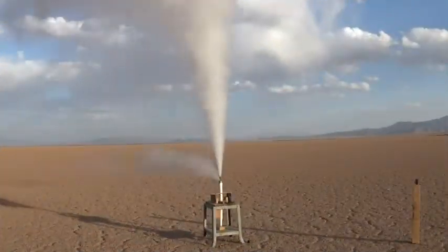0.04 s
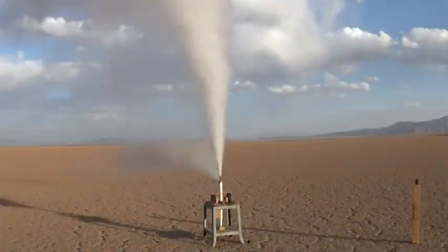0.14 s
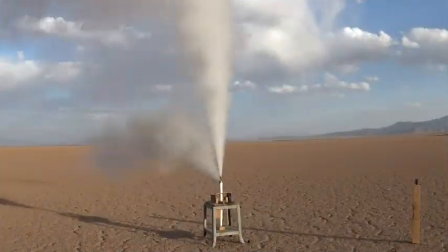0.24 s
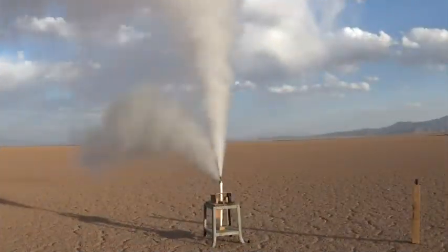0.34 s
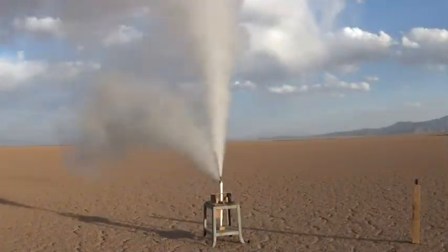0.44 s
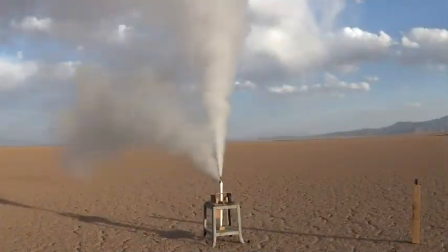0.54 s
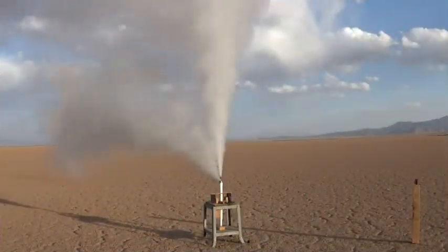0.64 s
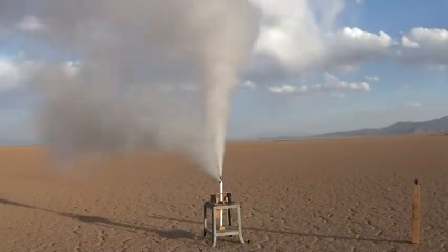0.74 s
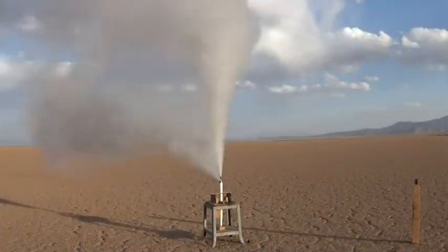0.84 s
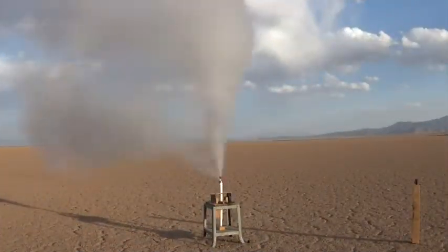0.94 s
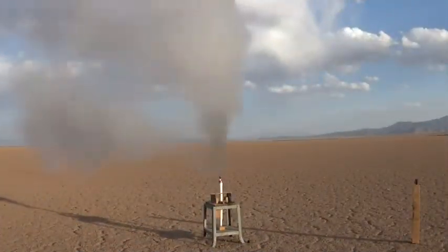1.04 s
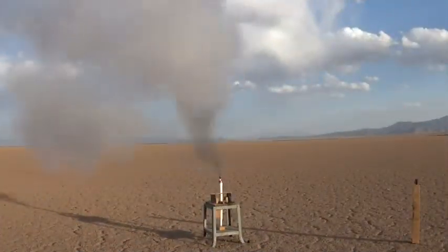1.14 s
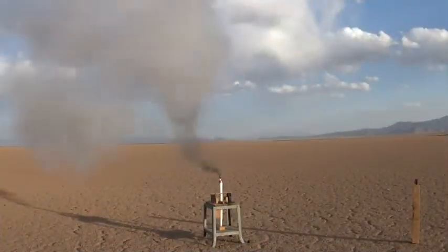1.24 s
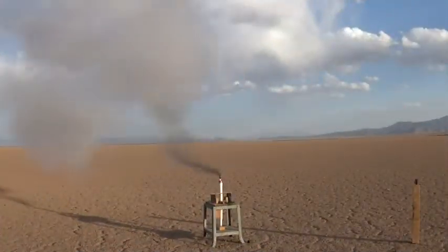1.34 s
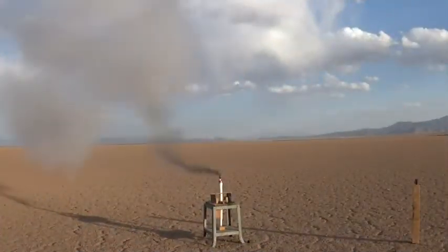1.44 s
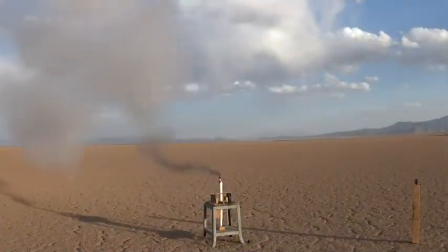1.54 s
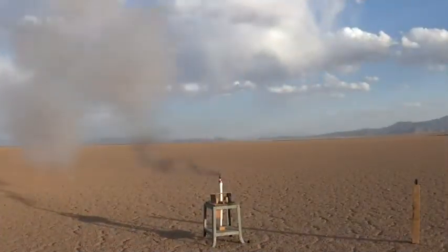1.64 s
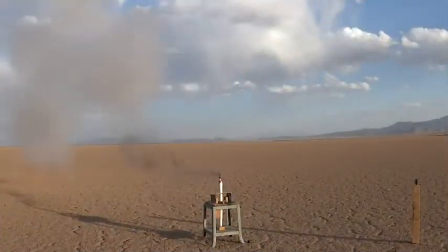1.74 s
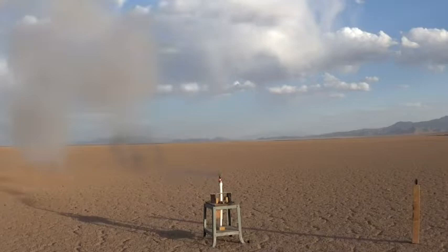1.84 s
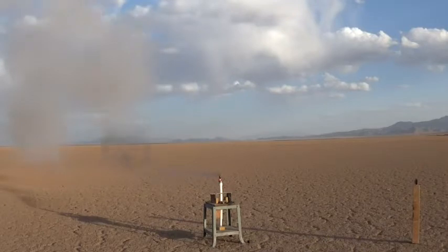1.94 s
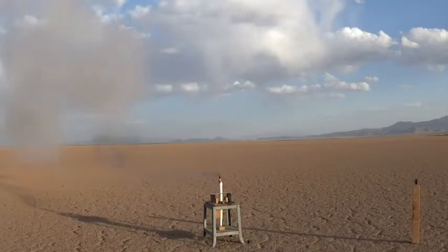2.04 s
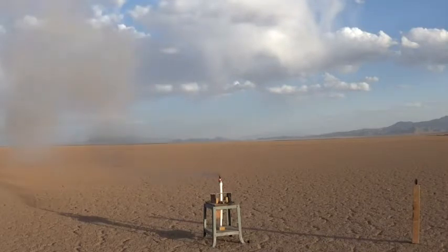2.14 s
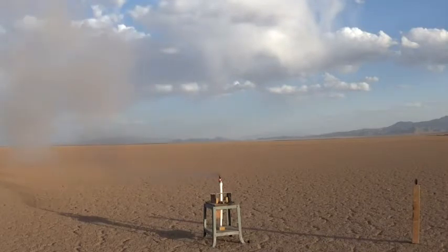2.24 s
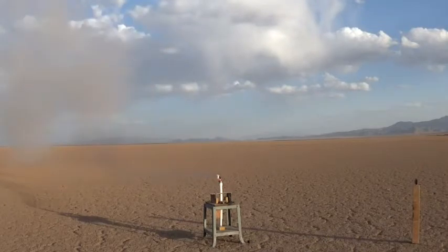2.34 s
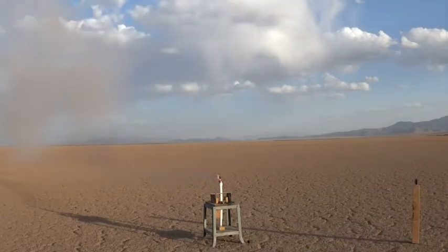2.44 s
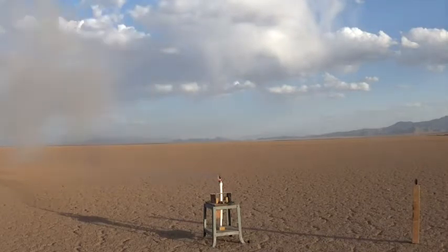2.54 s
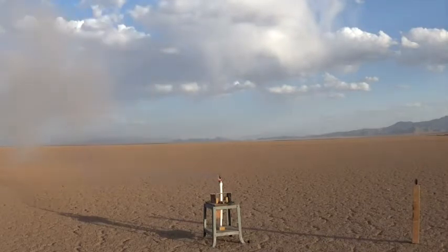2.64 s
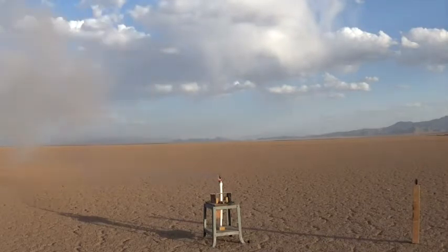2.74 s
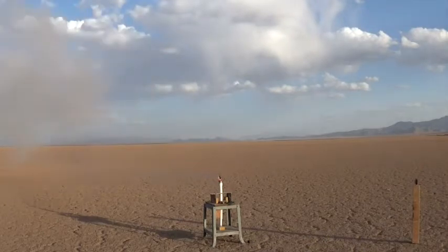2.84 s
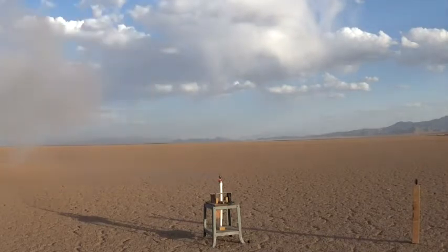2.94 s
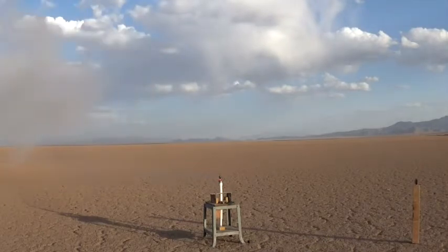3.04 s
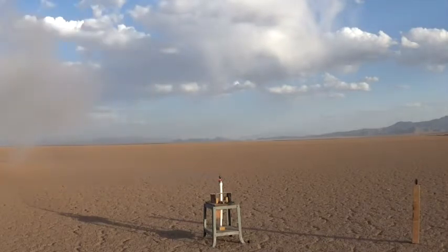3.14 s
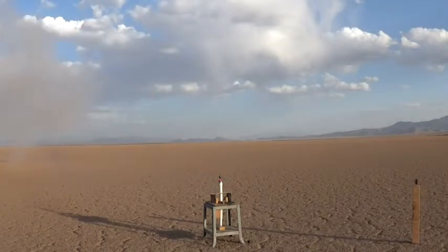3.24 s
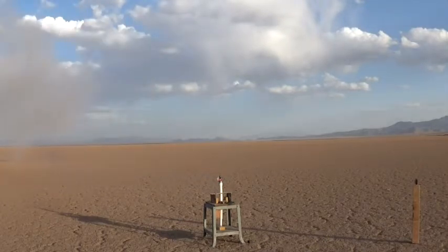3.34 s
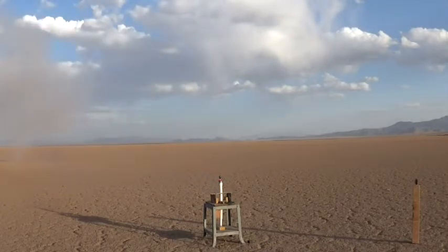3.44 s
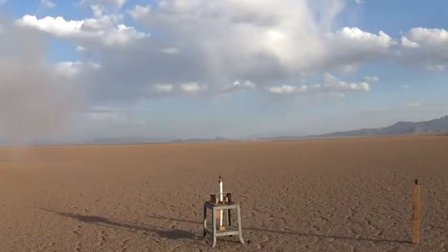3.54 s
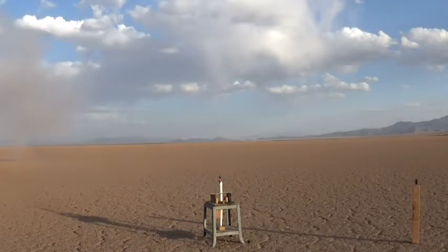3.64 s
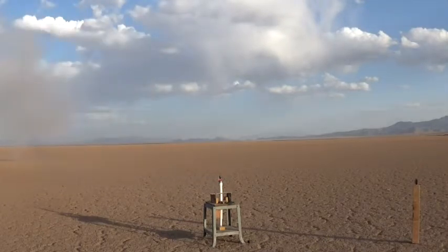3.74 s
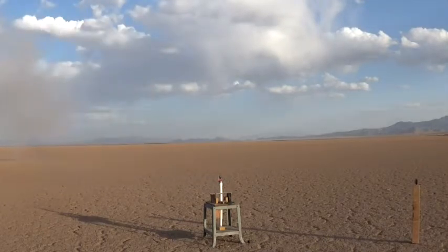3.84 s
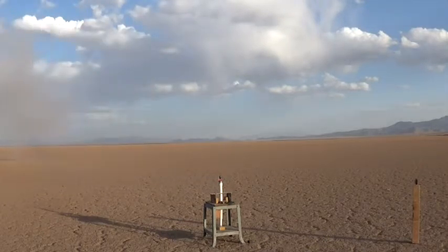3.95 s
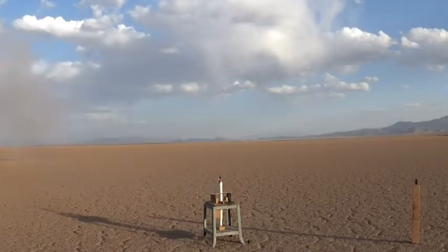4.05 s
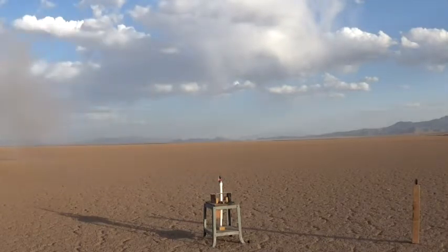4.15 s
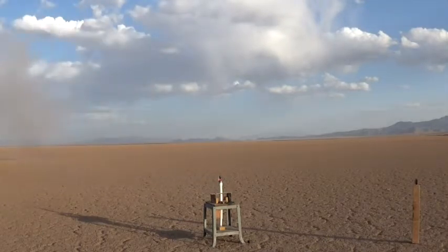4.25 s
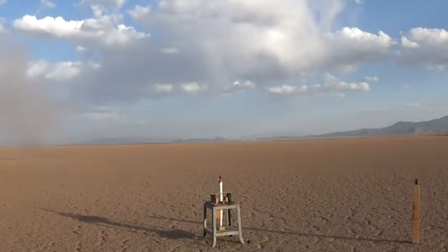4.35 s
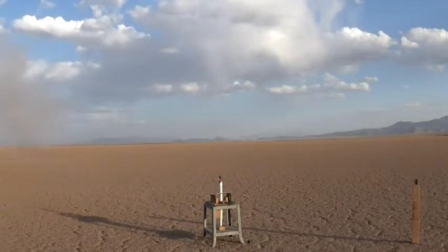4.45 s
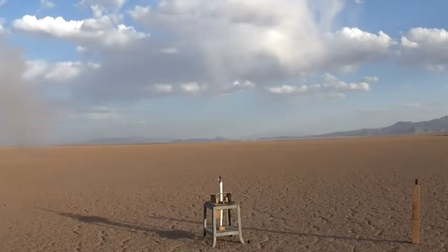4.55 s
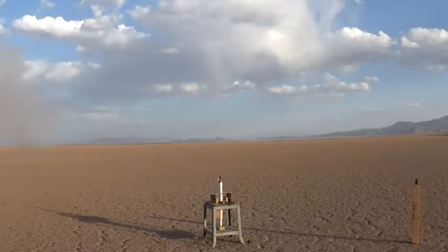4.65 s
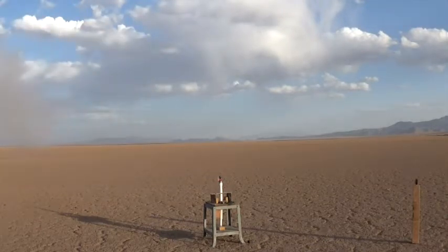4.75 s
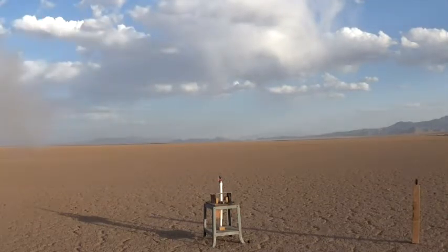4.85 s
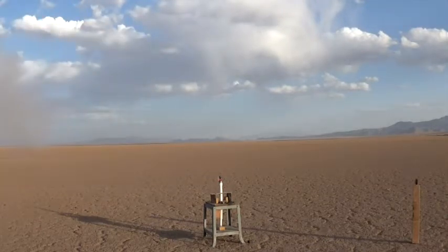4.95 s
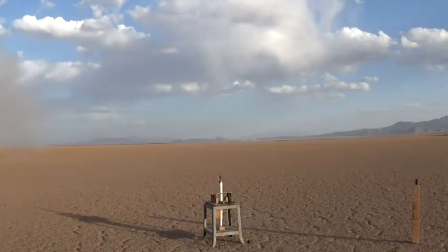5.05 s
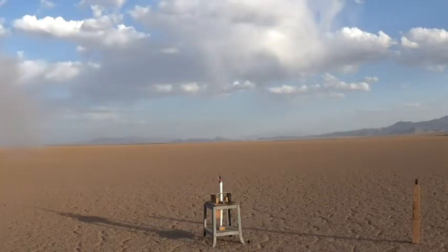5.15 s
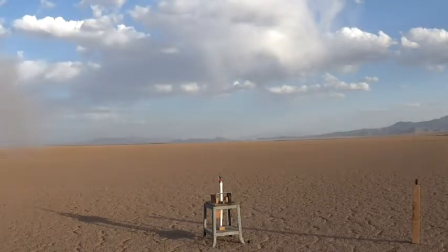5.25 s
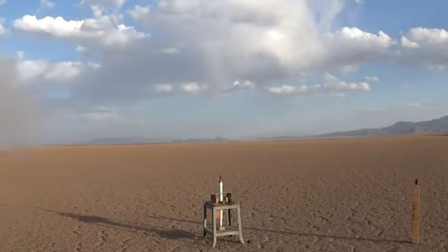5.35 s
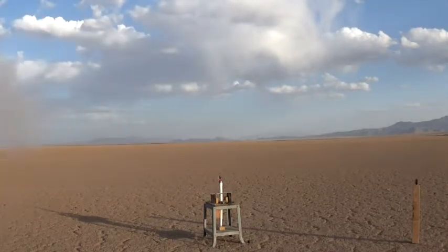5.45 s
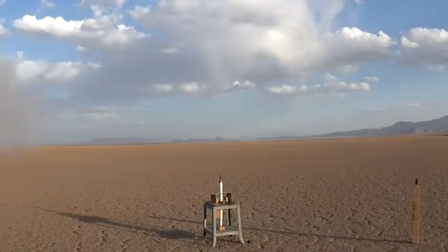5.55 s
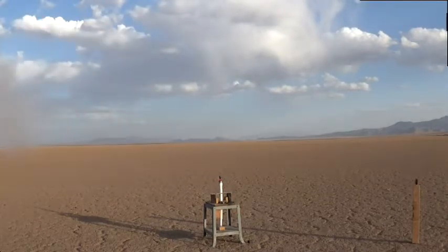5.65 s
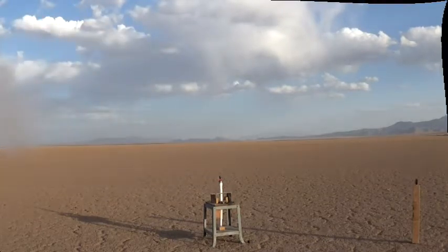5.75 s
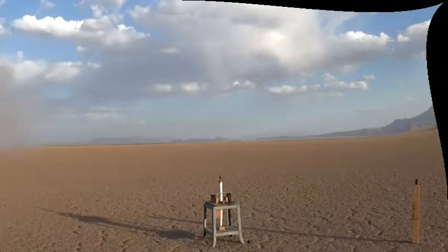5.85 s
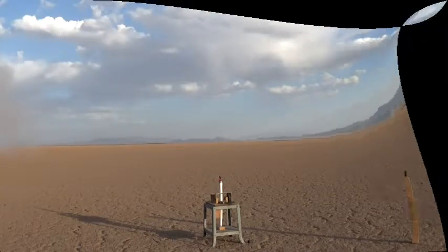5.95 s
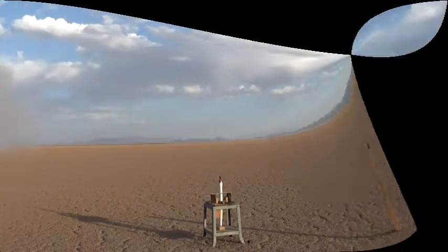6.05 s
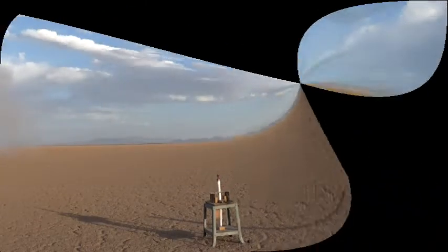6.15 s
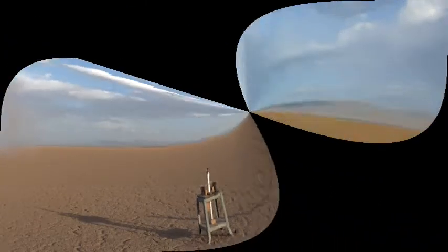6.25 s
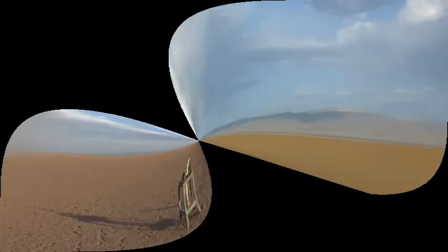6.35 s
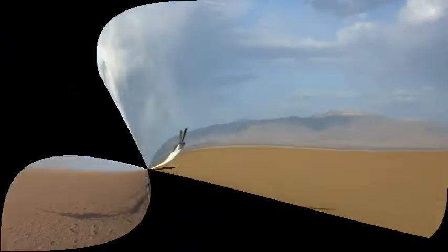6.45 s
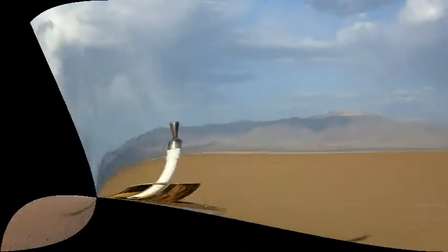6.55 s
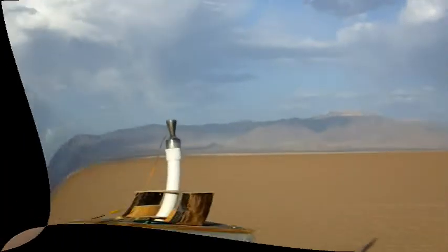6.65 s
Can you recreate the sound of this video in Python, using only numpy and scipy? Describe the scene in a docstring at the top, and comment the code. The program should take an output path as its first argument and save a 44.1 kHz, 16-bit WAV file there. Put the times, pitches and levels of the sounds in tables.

```python
"""Rocket motor burnout on a windy lakebed

A small rocket motor on a test stand burns out on an open dry lakebed, a few metres from a camera.
Fine noise hisses at the nozzle and coarse noise roars in the plume, both following the chamber pressure;
as the plume shrinks, a delayed copy off the ground hollows the hiss. Then a freshening wind, made of
gusting noise bands, rushes past the microphone and short noise ticks stand for a little grit.
At last the scene fades over to another, windier one with a heavy, lumpy rumble."""
import sys
import numpy as np
from scipy import signal
from scipy.fft import rfft, irfft, next_fast_len
from scipy.io import wavfile
from scipy.ndimage import uniform_filter1d

SR = 44100
rng = np.random.default_rng(int(sys.argv[2]) if len(sys.argv) > 2 else 0)


def log_audio(samples):
    """Write samples as a 16-bit WAV file to the path given in sys.argv[1]."""
    # one column per channel
    frames = np.atleast_2d(samples).T
    # limit to full scale, then quantise
    limited = np.clip(frames, -1, 1)
    pcm = np.round(limited * 32767).astype(np.int16)
    wavfile.write(sys.argv[1], SR, pcm)


N = 295029
TIME = np.arange(N) / SR
HZ = np.fft.rfftfreq(N, 1 / SR)
TAPER_S = 0.89  # the grain starts to run out

# streaming air, likeness of the two ports: f/Hz, likeness (1 = identical)
AIR_SAME = [(30, 1), (70, .93), (220, .8), (900, 0.94), (3000, 0.85), (7000, 0.82), (11000, .85)]
# streaming air, phase by which the left port leads: f/Hz, phase/rad
AIR_PHASE = [(80, 0.08), (170, 0.55), (430, 1.52), (900, 1.83), (2000, 1.54), (3000, 1.2), (5000, 0.65),
             (10000, 0.1)]


def gain_of(db):
    """Decibels to amplitude."""
    return 10 ** (np.asarray(db) / 20)


def evened(x):
    """Scales to rms 1."""
    return x / np.sqrt(np.mean(x ** 2) + 1e-20)


def read(points, hz):
    """Reads a frequency table on a log-frequency axis."""
    f, value = np.transpose(points)
    return np.interp(np.log(hz + 1), np.log(f + 1), value)


def since(s):
    """Seconds gone by since a moment, zero before it."""
    return np.maximum(TIME - s, 0)


def swell(start, length, rise_s, fall_s):
    """Attack, hold and release between 0 and 1; a very short one turns back before it reaches 1."""
    rise = (TIME - start) / rise_s
    fall = (start + length - TIME) / fall_s
    return np.clip(np.minimum(rise, fall), 0, 1)


def wander(slow_hz, fast_hz):
    """Random drift of rms 1, equally strong in each octave between two rates."""
    shape = (HZ > slow_hz) / np.sqrt(HZ + 1) / (1 + (HZ / fast_hz) ** 4)
    return evened(irfft(rfft(rng.standard_normal(N)) * shape, N))


def turbulence(spectrum, likeness, lead=0):
    """Coloured noise at the two microphone ports, partly alike, the left one leading in phase."""
    left, other = rfft(rng.standard_normal((2, N)))
    same = np.clip(likeness, -1, 1)
    right = (same * left + np.sqrt(1 - same ** 2) * other) * np.exp(-1j * lead)
    pair = irfft(np.array([left, right]) * gain_of(read(spectrum, HZ)), N)
    return pair / np.std(pair.mean(0))


def grit(trim_db=-6):
    """Single grains of dust brush softly against the camera: bell-shaped bursts of bright noise."""
    # grain ticks: t/s, peak before trim/dB, half length/s
    ticks = [(1.702, -40, .002), (1.7055, -42, .0015), (1.726, -44, .0008), (1.7444, -48, .004),
             (1.779, -40.5, .003), (2.485, -40, .002), (3.807, -40, .002), (4.032, -43, .002),
             (4.432, -41, .002), (4.5061, -37, .002), (4.767, -36, .002), (4.82, -42, .0015),
             (4.832, -42, .0015), (5.029, -41, .001), (5.0715, -39, .0012), (5.813, -37, .002),
             (5.96, -41, .002), (6.414, -42, 0.0022)]
    # colour of a tick: f/Hz, level/dB
    tick_colour = [(500, -18), (2500, 15.5), (5000, -5), (9000, -24), (12000, -42), (15000, -64)]
    envelope = sum(gain_of(db + trim_db) * np.exp(-((TIME - s) / half_s) ** 2) for s, db, half_s in ticks)
    return envelope * turbulence(tick_colour, read(AIR_SAME, HZ), read(AIR_PHASE, HZ))


def breeze(force_db, gust_db, bright_db, rush_db=-33.0, hiss_db=-49.0, fizz_db=-77,
           rush_gust_share=0.48, hiss_force_share=0.391, fizz_force_share=0.2523,
           rush_flicker_db=0.85, hiss_flicker_db=1.33, puff_db=0.92, grain_db=2):
    """Air streams round the camera: a dull rush follows the force, a hiss and thin fizz leap with gusts."""
    # colour of the dull rush: f/Hz, level/dB
    rush_colour = [(15, -35.5), (55, -14.5), (115, -6.5), (250, -3), (340, -4), (450, -5), (600, -7),
                   (900, -13), (1300, -24.5), (2000, -43), (4000, -110)]
    # colour of the hissing eddies: f/Hz, level/dB
    eddy_colour = [(500, -19), (1000, 4.5), (1400, 1.5), (2000, -3.5), (3000, -13), (4500, -24),
                   (7000, -37.5), (11000, -52.5)]
    # colour of the thin fizz: f/Hz, level/dB
    fizz_colour = [(1500, -11), (3500, 4), (5500, 4), (7500, -1.5), (10000, -4.5), (12000, -27),
                   (15500, -50)]
    same, lead = read(AIR_SAME, HZ), read(AIR_PHASE, HZ)
    eddy = wander(8.4, 97)

    rush_level_db = rush_db + force_db + rush_gust_share * gust_db + rush_flicker_db * eddy
    hiss_level_db = hiss_db + hiss_force_share * force_db + gust_db
    fizz_level_db = fizz_db + fizz_force_share * force_db + gust_db + bright_db
    rush = turbulence(rush_colour, same, lead) * gain_of(rush_level_db)
    hiss = turbulence(eddy_colour, same, lead) * gain_of(hiss_level_db)
    fizz = turbulence(fizz_colour, same, lead) * gain_of(fizz_level_db)

    # the smallest eddies break the treble into fine grain
    flicker_db = hiss_flicker_db * eddy + puff_db * wander(4.4, 29.6) + grain_db * wander(110, 804.3)
    return rush + (hiss + fizz) * gain_of(flicker_db)


def thumps(trim_db=-10, swell_s=0.0081):
    """One large eddy at a time swells against both ports and passes: short bursts of low noise."""
    # single eddies, each peaking half a swell_s after t: t/s, peak before trim/dB
    eddies = [(0.788, -20.5), (1.274, -24.5), (1.357, -32), (1.48, -29), (1.963, -33), (2.01, -25),
              (2.218, -36), (2.345, -20), (2.412, -22), (2.574, -29), (3.157, -29), (3.226, -20.5),
              (3.291, -21), (3.36, -20), (3.485, -26), (3.595, -20), (3.688, -14), (3.796, -20.5),
              (3.896, -11), (4.11, -22), (4.17, -19), (4.629, -20.5), (4.969, -20), (5.043, -19),
              (5.196, -18.5), (5.333, -21), (5.44, -29), (5.687, -14.5), (6.078, -9), (6.438, -11.5)]
    # colour of a thump: f/Hz, level/dB
    thump_colour = [(20, -22.5), (60, -11), (120, -1.5), (220, 1), (330, -4), (700, -36), (4000, -100)]
    envelope = sum(gain_of(db + trim_db) * np.exp(-((TIME - s) / swell_s - .5) ** 2) for s, db in eddies)
    return envelope * turbulence(thump_colour, read(AIR_SAME, HZ), read(AIR_PHASE, HZ))


def buffeting(force_db, gust_db, push_db, press_db=-42.5, steepness=2.206, gust_share=0.19,
              next_scene_s=5.74, fade_s=0.34, next_scene_db=13.5,
              low_band_s=5.94, low_band_length_s=0.633, low_band_edge_s=0.055, low_band_db=-27.5,
              low_band_rise_db_per_s=7, low_band_gust_share=0.29, low_band_share_db=-15.0,
              lumps_db=0.74, rumble_surge_share=0.56, low_band_surge_share=1.0, surge_edge_s=0.0093,
              right_db=1.5, breakaway_db=-34, calm_db=1):
    """Eddies strike the ports, the right harder: a lumpy rumble, and hoarse low noise that stops near 900 Hz."""
    # colour of gentle pressing air: f/Hz, level/dB
    gentle_colour = [(10, -15), (30, -4), (60, 0), (110, 2), (170, -1.5), (300, -14.5), (700, -35.5),
                     (4000, -110)]
    # colour of the broken-away rumble: f/Hz, level/dB
    rumble_colour = [(8, -6), (25, 6), (60, 2), (120, -5), (250, -21), (600, -29.5), (1200, -44.5),
                     (8000, -110)]
    # colour of the dull, hoarse low noise: f/Hz, level/dB
    low_band_colour = [(40, -5), (130, -1.5), (300, -0.5), (480, -5.5), (800, -2.5), (880, -13.5),
                       (940, -39), (2000, -48), (8000, -110)]
    # likeness of the ports in a broken flow: f/Hz, likeness (1 = identical)
    port_likeness = [(30, 0.85), (110, 0.66), (250, 0.72), (500, 0.98), (850, 0.46)]
    # the level jumps up and dips briefly: start/s, length/s, change before each layer's share/dB
    surges = [(5.95, 0.074, 2), (6.025, 0.038, -4), (6.065, 0.021, 4), (6.1, 0.022, -11),
              (6.315, 0.042, 2.5), (6.35, 0.029, -12), (6.425, 0.029, 5), (6.488, 0.02, 3),
              (6.595, 0.041, 6), (6.64, 0.072, 5)]

    # the windier scene fades in and then holds
    next_scene = np.minimum(since(next_scene_s) / fade_s, 1)
    rumble_db = press_db + steepness * force_db + gust_share * gust_db + push_db + next_scene_db * next_scene
    surges_db = sum(db * swell(s, length, surge_edge_s, surge_edge_s) for s, length, db in surges)
    height_db = low_band_db + low_band_rise_db_per_s * since(low_band_s) + low_band_gust_share * gust_db
    height = swell(low_band_s, low_band_length_s, low_band_edge_s, low_band_edge_s) * gain_of(height_db)

    # gentle air presses softly on both ports alike; a strong flow breaks away at each port on its own
    broken = 1 / (1 + gain_of(2 * (breakaway_db - rumble_db)))
    gentle = turbulence(gentle_colour, read(AIR_SAME, HZ), read(AIR_PHASE, HZ))
    gentle = gentle * (1 - broken) * gain_of(rumble_db + calm_db)

    same = read(port_likeness, HZ)
    rumble = turbulence(rumble_colour, same) * broken
    rumble = rumble * gain_of(rumble_db + rumble_surge_share * surges_db)
    low_band_level = np.hypot(height, broken * gain_of(rumble_db + low_band_share_db))
    low_band = turbulence(low_band_colour, same) * gain_of(low_band_surge_share * surges_db) * low_band_level

    lumps = gain_of(lumps_db * wander(9.4, 80))
    port_gains = gain_of([[-right_db / 2], [right_db / 2]])
    return lumps * (gentle + (rumble + low_band) * port_gains)


def thrust(sag_db_per_s=1.3, taper_db_per_s=29, burnout_s=1.03, collapse_db_per_s=193):
    """Chamber pressure in dB relative to its start: a slow sag, a taper, a collapse, each adding on."""
    return -sag_db_per_s * TIME - taper_db_per_s * since(TAPER_S) - collapse_db_per_s * since(burnout_s)


def plume(level_db=-21.0, wane_db_per_s=7.0, thrust_share=.5, lift_s=0.98, lift_loss_db_per_s=45,
          billow_db=1.5, crackle_db=1.6, bass_hz=500, shorten_s=0.79, bass_loss_db_per_s=70):
    """Large eddies roar, wide and ragged, and fade with the thrust; as the plume shortens, bass goes first."""
    # colour of the roar: f/Hz, level/dB
    roar_colour = [(15, -35), (25, -12), (54, -11), (129, 1), (332, 1), (476, 1.5), (1500, -3.5),
                   (1950, -32), (3300, -120)]
    # phase by which the left port leads: f/Hz, phase/rad
    roar_phase = [(110, 0.08), (250, 0.45), (600, 1.2), (900, 1.1), (1500, 0), (2500, 0.038)]
    # likeness of the two ports: f/Hz, likeness (1 = identical)
    roar_likeness = [(70, 0.88), (130, 0.97), (250, 0.55), (520, 0.32), (900, 0.52), (1500, 0.51)]
    roar = turbulence(roar_colour, read(roar_likeness, HZ), read(roar_phase, HZ))
    bass = irfft(rfft(roar) / (1 + (HZ / bass_hz) ** 4), N)
    crackle = (roar - bass) * gain_of(crackle_db * wander(58, 402))
    roar = crackle + bass * gain_of(-bass_loss_db_per_s * since(shorten_s))
    fade_db = -wane_db_per_s * TIME - lift_loss_db_per_s * since(lift_s) + thrust_share * thrust()
    return roar * gain_of(level_db + fade_db + billow_db * wander(8, 59.4))


def nozzle(burn_db=-8, spurt_s=0.012, dying_sputter_db=1, ground_s=.00111, echo=.42, spent_at_db=7,
           shrink_db=11, sway_db=0.48, pivot_hz=7000, patchy_db=1.0):
    """Fine jet turbulence sways in brightness; as pressure falls it narrows, sputters and gains an echo."""
    # colour of the hiss at full pressure: f/Hz, level/dB
    hiss_colour = [(590, -35), (1000, -20), (1790, -6.5), (2420, -7), (5460, -1.5), (6950, -3), (9690, 1.6),
                   (10700, 0.5), (12900, -10), (14800, -18), (15500, -15.5)]
    # part of the hiss that the ports do not share: f/Hz, level/dB
    unshared = [(1000, 0.5), (1600, -2), (2300, -6), (3400, -23), (7000, -20), (10000, -37.5),
                (15000, -40.5)]
    # how the failing pressure recolours the hiss: f/Hz, change when spent/dB
    spent_colour = [(500, -13), (900, -1), (1400, 0.5), (2000, 2.5), (3300, 7.5), (5000, 3.5), (7000, 0.7),
                    (10000, -1.5), (12000, -1.5), (15000, -3.5)]
    # the last scraps of fuel flare up: t/s, lift/dB
    spurts = [(1.033, 0.62), (1.096, 4.4), (1.147, 3.7), (1.185, 1.4)]
    apart = np.minimum(gain_of(read(unshared, HZ)), 1)
    hz, t, z = signal.stft(turbulence(hiss_colour, np.sqrt(1 - apart ** 2)), SR, nperseg=512)

    # both go from 0 at full pressure to 1
    shrunk = 1 - np.exp(-(thrust() / shrink_db) ** 2)
    spent = 1 - np.exp(-(thrust() / spent_at_db) ** 2)
    narrowing_db = np.outer(read(spent_colour, hz), np.interp(t, TIME, spent))

    # treble and bass seesaw about the pivot
    tilt = np.tanh(2 * np.log2((hz + 1) / pivot_hz))
    sway = np.outer(tilt, np.interp(t, TIME, wander(6, 50)))
    # small patches in time and pitch, the same at both ports
    patches = uniform_filter1d(rng.standard_normal(z.shape[1:]), size=5, axis=0)
    patches = evened(uniform_filter1d(patches, size=4, axis=1))
    z = z * gain_of(narrowing_db + sway_db * sway + patchy_db * patches)
    hiss = signal.istft(z, SR, nperseg=512)[1][:, :N]

    # one sharp ground echo
    strength = echo * shrunk
    bounced = irfft(rfft(hiss) * np.exp(-2j * np.pi * HZ * ground_s), N)
    hiss = (hiss + strength * bounced) / np.sqrt(1 + strength ** 2)

    spurts_db = sum(db * np.exp(-((TIME - s) / spurt_s) ** 2) for s, db in spurts)
    sputter_db = dying_sputter_db * shrunk * wander(60, 500)
    return hiss * gain_of(burn_db + thrust() + spurts_db + sputter_db)


def drawn_in(pair, narrow_db_per_s=90):
    """As the jet shortens to a point at the nozzle, both ports come to hear the same sound."""
    middle = pair.mean(0)
    return middle + (pair - middle) * gain_of(-narrow_db_per_s * since(TAPER_S))


def lakebed(x, scatter_db=-35, t60=0.49):
    """The cracked ground ahead scatters a faint, short noise tail, with one response for both ports."""
    t = TIME[:SR // 2]
    tail = rng.standard_normal(len(t)) * gain_of(-60 * t / t60)
    tail = tail[None] / np.linalg.norm(tail)
    return x + gain_of(scatter_db) * signal.fftconvolve(x, tail, axes=1)[:, :N]


def scene(gust_rise_s=.025, gust_fall_s=.065):
    """The motor over the lakebed, and the wind at the camera, windier at the end."""
    # the wind freshens: t/s, force/dB
    wind_force = [(1, -9), (1.3, -6.5), (2.1, -4), (3.17, -4), (3.44, -1), (4.15, -1.5), (4.75, 1.5),
                  (5.12, 1), (5.25, 2.5), (5.9, 3), (6.68, 3.5)]
    # gusts and lulls at full swell: start/s, length/s, strength/dB, brightness/dB, push on the ports/dB
    gusts = [(1.105, 0.2, -0.5, 6, 7), (1.248, 0.22, .5, 6, 8), (1.47, 0.217, 2.9, 1.5, 4),
             (1.674, .15, 4, 5, -4), (1.926, 0.201, 2, 2, 7), (2.15, 0.25, 3, 3, -11),
             (2.298, .1, -0.5, -3, 0), (2.457, 0.213, 3.5, -1, -1), (2.71, 0.087, 4, -1, -6),
             (2.887, 0.077, 2, -3, 2), (3.07, 0.13, 3, -6, -8), (3.253, 0.13, -3.5, 5.5, 10),
             (3.35, 0.29, 3.5, 6, 7.5), (3.64, .085, 3.5, 7, -5), (3.777, 0.17, 4, -3, -1),
             (3.923, 0.2, 3.5, -3.5, -3), (4.171, 0.15, 1, -0.5, 9), (4.4, 0.17, 2.5, .5, 1),
             (4.587, 0.075, 5.5, 1.5, -5), (4.728, 0.16, 5.5, -5.5, 0), (4.94, 0.058, -11, 5, 13),
             (4.97, 0.13, 2, -11, -1), (5.12, 0.068, -7, -2, 16), (5.233, 0.22, 3, 4, 0),
             (5.428, 0.27, 3.5, 2.5, -5), (5.771, 0.26, 4.5, -1, 0), (6.054, .18, 3.5, 0, -1),
             (6.25, 0.068, 0, 0, -6), (6.3, 0.27, 3, -.5, 1), (6.528, 0.091, -9, 0, 3.5)]
    force_db = np.interp(TIME, *np.transpose(wind_force))
    gust_db, bright_db, push_db = sum(
        np.outer([db, bright, push], swell(s, length, gust_rise_s, gust_fall_s))
        for s, length, db, bright, push in gusts)
    wind = grit() + breeze(force_db, gust_db, bright_db) + thumps() + buffeting(force_db, gust_db, push_db)
    motor = lakebed(plume() + drawn_in(nozzle()))
    return wind + motor


def record(dry, headroom=1.9, ceiling=.95, hardness=6, edge_hz=15450):
    """Overload squashes the boosted treble first and then rounds the peaks; a steep low-pass follows."""
    size = next_fast_len(N + SR) // 2 * 2
    treble_lift = [(7000, 0), (9200, 10), (11000, 10), (13500, 0)]  # f/Hz, boost/dB
    boost = gain_of(read(treble_lift, np.fft.rfftfreq(size, 1 / SR)))
    boosted = irfft(rfft(dry, size) * boost, size)
    hot = headroom * np.tanh(boosted / headroom)
    squashed = irfft(rfft(hot) / boost, size)[:, :N]  # the boost is undone
    rounded = squashed / (1 + abs(squashed / ceiling) ** hardness) ** (1 / hardness)
    low_pass = signal.firwin(511, edge_hz, window=("kaiser", 9), fs=SR)
    return signal.oaconvolve(rounded, low_pass[None], "same")


dry = scene()
out = record(dry)
log_audio(out)
```